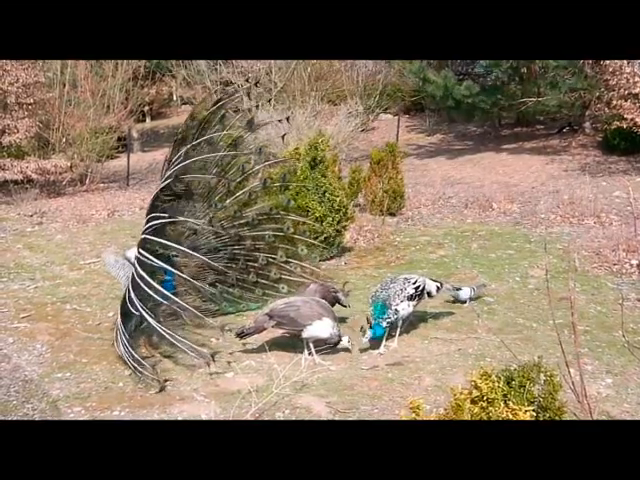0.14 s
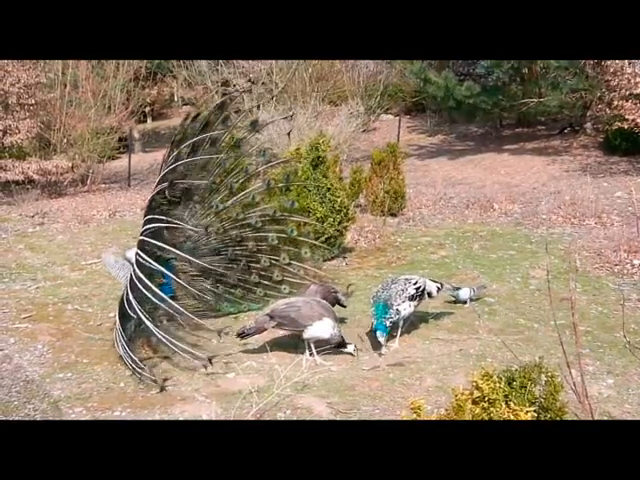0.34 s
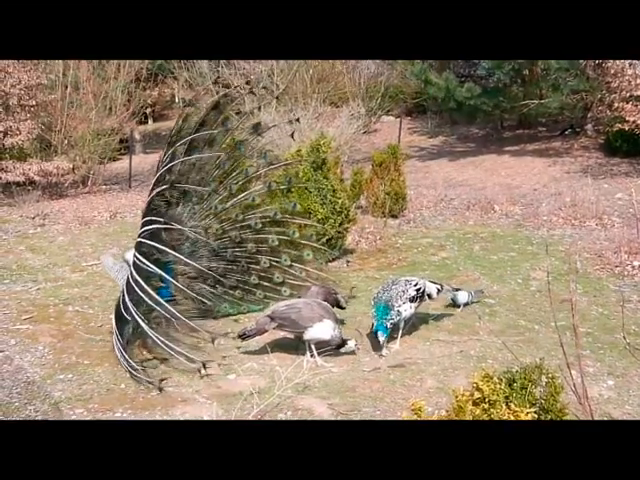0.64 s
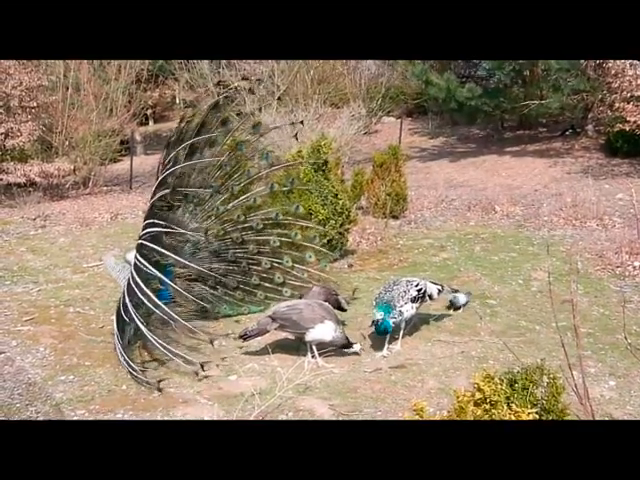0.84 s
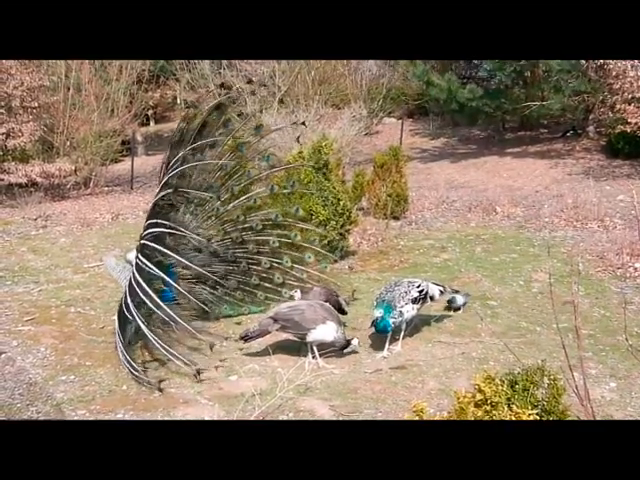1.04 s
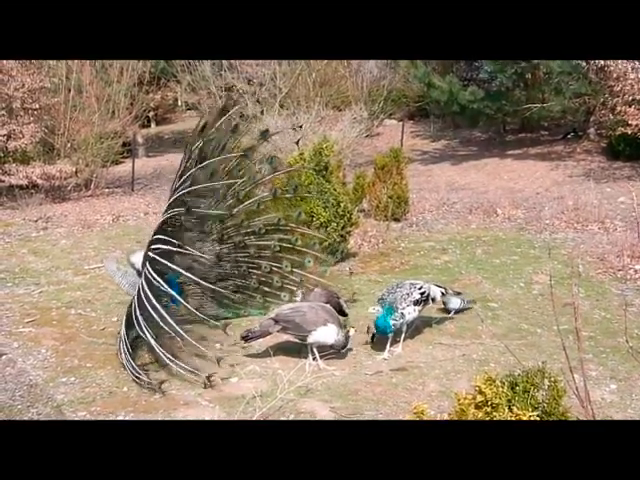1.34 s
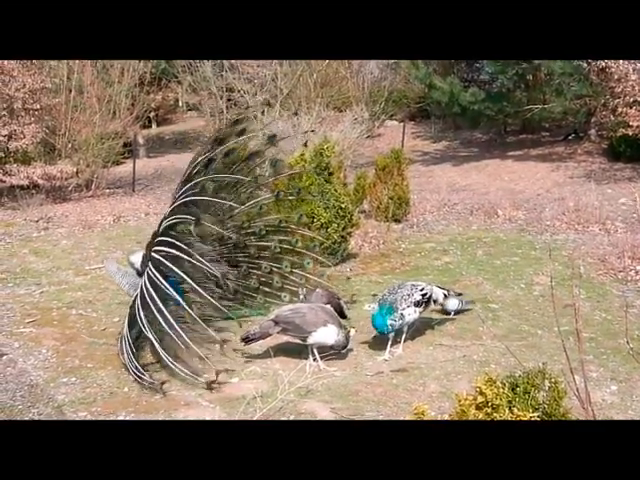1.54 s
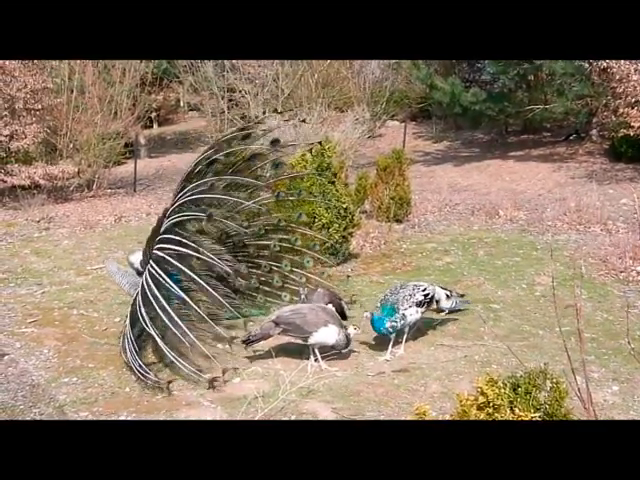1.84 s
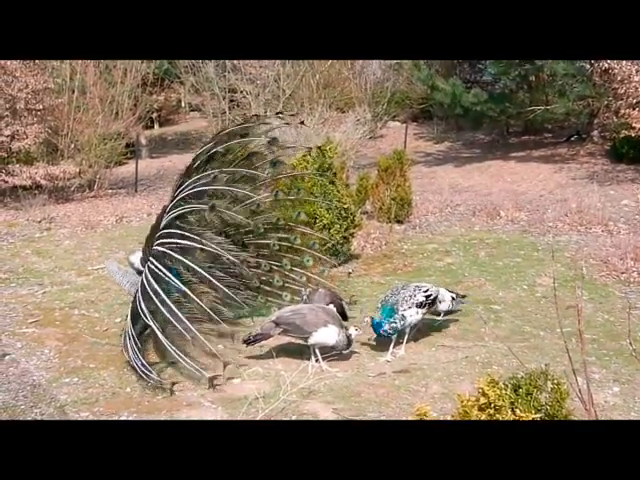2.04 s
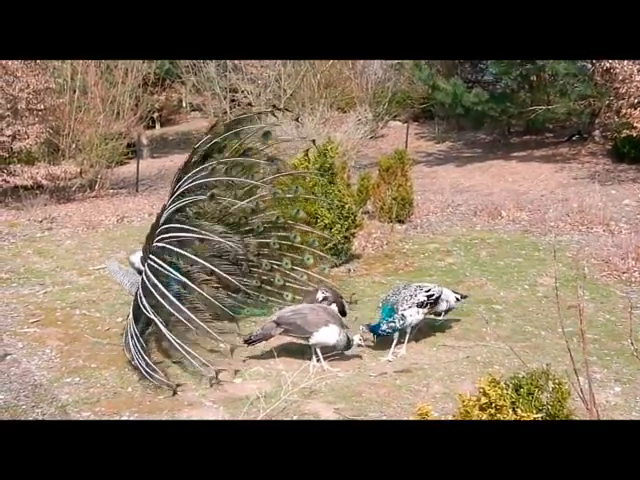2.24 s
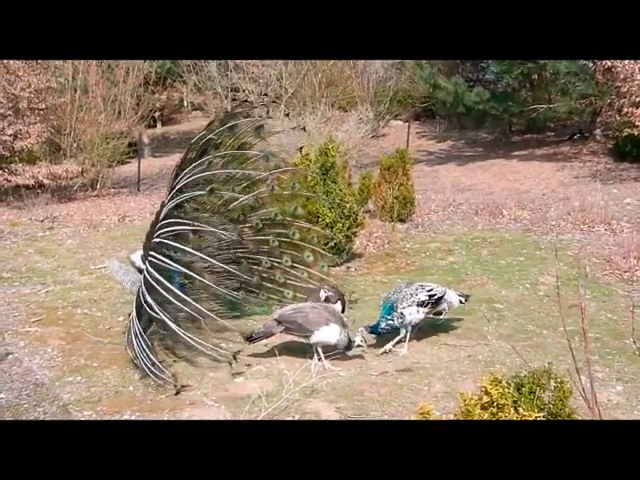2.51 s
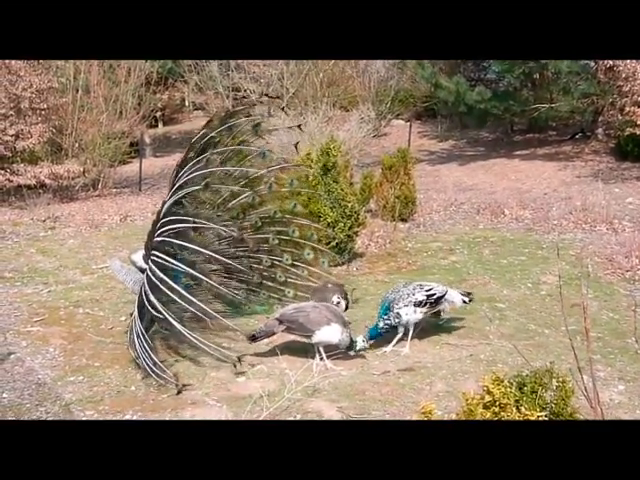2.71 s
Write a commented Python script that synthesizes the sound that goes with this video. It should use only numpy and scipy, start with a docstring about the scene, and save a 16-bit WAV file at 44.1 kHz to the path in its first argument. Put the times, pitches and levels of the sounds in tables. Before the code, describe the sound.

Dry rattling feathers of a displaying peacock, strongest after one second, fade out; small birds chirp and trill to the left, a nearby bird clucks, a closer peep follows, dull taps end it. Open lawn, stereo microphone, faint hiss.

```python
"""A peacock shivers its fanned train from the start: random ticks of barbs and quills swell in bursts, then die off.
Low drone noise, wind rumble on the microphone and open-air hiss lie below; drone and wind come and go.
Songbirds on the left join in: gliding sine tones fall, hold and rise, and two warbled ones trill downward.
Soft thumps and dull taps, both short fading tones, come between; a nearby bird clucks in five tone pulses.
A louder, closer peep follows, and the last taps end the scene."""
import sys
import numpy as np
from scipy import signal
from scipy.io import wavfile
from scipy.ndimage import uniform_filter1d

SR = 44100
rng = np.random.default_rng(int(sys.argv[2]) if len(sys.argv) > 2 else 0)


def unload_wav(signal):
    """Save mono or channel-first audio to the path in sys.argv[1] as 16-bit WAV at rate SR, clipped to [-1, 1]."""
    wavfile.write(
        sys.argv[1],
        SR,
        np.round(np.clip(np.atleast_2d(signal).T, -1, 1) * 32767).astype(np.int16),
    )


def decibels_to_gain(level_db):
    """Convert a level in decibels to a linear amplitude gain (20 dB per decade)."""
    exponent = np.asarray(level_db, float) / 20
    return 10 ** exponent


N = 126567
T = np.arange(N) / SR   # time of each sample, in seconds

# How hard the train shakes. Each row: time in seconds, level in dB before the feathers' own boost.
SHAKE_VIGOUR = [(0.0, -50.5), (0.184, -45.5), (0.2, -47.5), (0.258, -45), (0.296, -51.5), (0.47, -54),
                (0.48, -50.5), (0.766, -47), (0.788, -54), (0.83, -55.5), (0.846, -52), (0.888, -53),
                (0.904, -61), (0.978, -51), (1.1, -43.5), (1.242, -42), (1.402, -43.5), (1.418, -47),
                (1.46, -44), (1.518, -49), (1.528, -45), (1.566, -48), (1.618, -48), (1.746, -53.5),
                (1.762, -60), (1.814, -52.5), (1.9, -61), (1.95, -65), (2.05, -95)]
# Tone colour of the feather ticks. Each row: pitch in Hz, relative strength in dB per Hz.
FEATHER_SPECTRUM = [(240, -26), (400, -15.5), (760, -2), (964, -4.5), (1630, 0), (3280, -4), (4100, -4.5),
                    (4980, -4.5), (11300, -7), (13100, -16), (14100, -21)]
# How alike the feathers sound left and right. Each row: pitch in Hz, likeness from 0 to 1.
FEATHER_LIKENESS = [(60, 0.57), (230, 0.96), (910, 1), (3520, 0.76), (13700, 0.61)]

# Far whistles, named by their glide. Each row: time in seconds, pitch in Hz, level in dB.
FALLING_WHISTLE = [(.968, 5720, -62), (.985, 5210, -54), (1.01, 5000, -56), (1.032, 4300, -52),
                   (1.045, 4500, -55), (1.062, 4450, -50), (1.085, 3630, -52), (1.11, 3000, -55),
                   (1.125, 2850, -63.5)]
HELD_WHISTLE = [(1.545, 4250, -63.5), (1.57, 4230, -56), (1.596, 4260, -55), (1.607, 4260, -69),
                (1.622, 4260, -49), (1.64, 4270, -58), (1.665, 4300, -58), (1.685, 4300, -62)]
RISING_WHISTLE = [(1.93, 3120, -65), (1.946, 3810, -52), (1.95, 4140, -60), (1.962, 3841, -66)]
LONG_RISING_WHISTLE = [(2.008, 2590, -62), (2.017, 2650, -56.5), (2.03, 3270, -55), (2.042, 3770, -46.5),
                       (2.051, 4020, -56), (2.058, 3770, -53), (2.064, 3600, -62)]
SHORT_RISING_WHISTLE = [(2.062, 2900, -68), (2.075, 3250, -59), (2.085, 3380, -66)]
FAINT_WHISTLE = [(2.278, 5600, -70), (2.287, 5000, -65), (2.295, 4050, -67), (2.31, 4050, -64),
                 (2.335, 4200, -66), (2.345, 4200, -75), (2.36, 4150, -63), (2.372, 4100, -72)]
# The near, louder whistle. Each row: time in seconds, pitch in Hz, level in dB.
NEAR_PEEP = [(2.475, 3880, -67), (2.487, 3851, -53), (2.511, 3993, -40), (2.527, 4064, -36),
             (2.567, 3968, -38), (2.581, 3975, -38), (2.591, 3900, -60), (2.597, 4096, -67)]
# Overtones of the peep, from the second harmonic up: level in dB against the main tone.
PEEP_OVERTONES = [-21, -25.5]
# Falling trills. Each row: time in seconds, centre pitch in Hz, level in dB before the throb.
SOFT_TRILL = [(1.69, 4450, -57), (1.703, 4250, -52), (1.72, 3980, -50), (1.75, 3650, -48),
              (1.79, 3470, -47), (1.835, 3380, -46.5), (1.875, 2970, -49), (1.895, 2800, -48)]
LOUD_TRILL = [(2.07, 4400, -60), (2.078, 4270, -56.5), (2.11, 3750, -47), (2.145, 3335, -48),
              (2.16, 3453, -43.5), (2.192, 3410, -42), (2.222, 2937, -44.5), (2.257, 2944, -49.5),
              (2.275, 2770, -48.5), (2.293, 2810, -51), (2.305, 2650, -54)]

# Clucks of the nearby bird. Each row: start in seconds, peak level in dB, pitch in Hz.
CLUCK_PULSES = [(2.197, -45, 644), (2.218, -42.5, 685), (2.241, -35.5, 628), (2.263, -33.5, 632),
                (2.291, -33, 618)]
# Soft low thumps. Each row: start in seconds, peak level in dB, pitch in Hz.
THUMP_PULSES = [(1.643, -40.5, 76), (2.274, -34, 70.0), (2.419, -37, 101)]
# Dull taps on the ground. Each row: start in seconds, peak level in dB, pitch in Hz.
TAP_PULSES = [(1.646, -41.5, 610), (2.746, -39.5, 567), (2.803, -41, 608), (2.815, -39, 500)]

# Strength of the low drone. Each row: time in seconds, level in dB.
DRONE_LEVEL = [(0.0, -46), (0.03, -46), (0.62, -70.5), (1.62, -50), (1.65, -50), (1.74, -50.5), (1.79, -45),
               (1.86, -47), (2.26, -51), (2.36, -39.5), (2.38, -59.5), (2.43, -41), (2.68, -44),
               (2.69, -38), (2.85, -44.5), (2.87, -42)]
# Strength of the wind on the microphone ports. Each row: time in seconds, level in dB.
WIND_GUSTS = [(0.0, -44.5), (0.07, -42.5), (0.45, -54.5), (0.49, -56), (0.52, -52.5), (1.62, -76),
              (1.65, -39.5), (1.7, -54), (2.02, -56.5), (2.3, -46), (2.39, -51.5), (2.42, -45),
              (2.49, -54.5), (2.73, -60), (2.75, -50), (2.87, -60)]
# Tone colour of the open air. Each row: pitch in Hz, relative strength in dB per Hz.
AIR_SPECTRUM = [(40, -2.5), (83, -3.5), (223, -7), (408, -14.5), (620, -13), (1200, -18), (2200, -22),
                (3500, -24), (5500, -28), (9000, -33), (13000, -36.5)]
# How alike the air sounds left and right. Each row: pitch in Hz, likeness from 0 to 1.
AIR_LIKENESS = [(60, 0.76), (250, 1), (900, 0.88), (3500, 0.17), (12000, 0.14)]
# Which side the air leans to. Each row: pitch in Hz, left minus right in dB.
AIR_BALANCE = [(60, 1.5), (250, -1.3), (900, 5.5), (3500, 8.5), (12000, 0.5)]


def rms_one(x):
    """Scales a sound to an average strength (rms) of 1."""
    return x / np.sqrt(np.mean(x ** 2) + 1e-20)


def in_time(rows):
    """Draws straight lines between the rows: one curve over time for each column."""
    s, *columns = np.transpose(rows)
    return [np.interp(T, s, c) for c in columns]


def at_hz(points, hz):
    """Reads a table at one pitch, on a scale of octaves."""
    table_hz, values = np.transpose(points)
    return np.interp(np.log(hz), np.log(table_hz), values)


def drift(rate_hz):
    """Slow random wandering with a spread of 1: smoothed noise, one value every 40 samples."""
    r = np.exp(-2 * np.pi * rate_hz * 40 / SR)
    noise = rng.standard_normal(N // 40 + 2002)
    slow = signal.lfilter([1], [1, -2 * r, r * r], noise)[2000:]   # drop the filter's start
    return np.interp(np.arange(N) / 40, np.arange(len(slow)), rms_one(slow))


def band(x, low_hz, high_hz):
    """Keeps only what lies between two pitches."""
    return signal.sosfilt(signal.butter(2, [low_hz, high_hz], "band", fs=SR, output="sos"), x)


def cut_above(x, hz):
    """Steeply removes all above a pitch."""
    return signal.sosfilt(signal.ellip(10, .5, 70, hz, fs=SR, output="sos"), x)


def pan(x, db):
    """Makes the left ear louder than the right by db."""
    return x * decibels_to_gain(np.array([[db / 2], [-db / 2]]))


def spread(mid, side, alike):
    """Mixes a shared and an opposed noise into two ears of a given likeness."""
    alike = np.clip(alike, 0, 1)
    shared = np.sqrt(1 + alike) * mid
    opposed = np.sqrt(1 - alike) * side * [[1], [-1]]
    return (shared + opposed) / np.sqrt(2)


def coloured(white, spectrum, alike, balance, patchy_db, from_hz, tilt_db=0.):
    """Half-octave bands with own level, flicker, likeness and balance; spread 1 from from_hz to 11900 Hz."""
    out = 0
    edges = np.minimum(40 * 2 ** np.arange(0, 9.1, .5), 18000)
    for k, (low, high) in enumerate(zip(edges, edges[1:])):
        hz = np.sqrt(low * high)
        mid, side = band(white[k % 2], low, high)   # neighbouring bands use different noise
        level_db = at_hz(spectrum, min(hz, 13000)) + patchy_db * drift(14)
        gain = decibels_to_gain(level_db + tilt_db * np.log2(hz / 7000))
        out = out + gain * pan(spread(mid, side, at_hz(alike, hz)), at_hz(balance, hz))
    return out / np.std(band(out, from_hz, 11900))


def pulses(rows, rise_s, fall_s, octave_db):
    """Short tones, each with its octave above, that swell and die away."""
    out = np.zeros(N)
    for s, db, hz in rows:
        t = np.maximum(T - s, 0)
        shape = (1 - np.exp(-t / rise_s)) ** 2 * np.exp(-t / fall_s)
        tone = np.sin(2 * np.pi * hz * t) + decibels_to_gain(octave_db) * np.sin(4 * np.pi * hz * t)
        out += decibels_to_gain(db) * shape / shape.max() * tone
    return out


def scatter(x, start_s, t60_s):
    """A cloud of fading echoes, a different one in each ear, of the same energy as the sound."""
    after = T[:SR // 2] - start_s
    cloud = rng.standard_normal((2, SR // 2)) * decibels_to_gain(-60 * after / t60_s) * (after > 0)
    cloud = cloud / np.sqrt(np.sum(cloud ** 2, axis=1, keepdims=True))
    return signal.fftconvolve(x, cloud, axes=1)[:, :N]


def feathers():
    """The train swings to and fro; ticks of uneven size are biggest at the turns of each swing."""
    shiver_hz, wander = 25.55, 0.032   # wander is a share of the shiver rate
    swing_depth, half_swing_depth = 0.069, 0.12
    ticks_per_s, tick_spread_db = 9000, 2.5   # ticks in each of four noise streams
    boost_db, pan_db = 2, 1.2
    brighter_db_per_octave = 0.0077   # for each dB of vigour
    turn = 2 * np.pi * np.cumsum(shiver_hz * (1 + wander * drift(1.93))) / SR
    bunching = 1 + swing_depth * np.cos(turn) + half_swing_depth * np.cos(2 * turn)
    shape = (2, 2, N)
    sizes = decibels_to_gain(tick_spread_db * np.minimum(rng.exponential(1, shape), 5))
    signs = rng.choice([-1, 1], shape)
    happens = rng.random(shape) < ticks_per_s / SR
    ticks = sizes * signs * happens * bunching
    vigour_db, = in_time(SHAKE_VIGOUR)
    below_peak_db = np.maximum(vigour_db, -65) - vigour_db.max()
    balance = [(100, pan_db), (10000, pan_db)]
    rustle = coloured(ticks, FEATHER_SPECTRUM, FEATHER_LIKENESS, balance, patchy_db=1.0, from_hz=4660,
                      tilt_db=brighter_db_per_octave * below_peak_db)
    return decibels_to_gain(vigour_db + boost_db) * rustle


def whistle(rows, flutter_db, swing_hz=0., top_s=0., throb=0., overtones_db=()):
    """A near sine along a pitch and level curve; a trill also swings in pitch and throbs in level."""
    trill_hz = 61.6   # warbles a second
    hz, db = in_time(rows)
    warble = np.cos(2 * np.pi * trill_hz * (T - top_s))   # highest at top_s
    phase = 2 * np.pi * np.cumsum(uniform_filter1d(hz, size=300) + swing_hz * warble) / SR
    edges = np.clip(np.minimum(T - rows[0][0], rows[-1][0] - T) / 0.002, 0, 1)   # 2 ms fades
    overtones = sum(decibels_to_gain(o) * np.sin((k + 2) * phase) for k, o in enumerate(overtones_db))
    tone = np.sin(phase) + overtones
    level = np.sqrt(2) * decibels_to_gain(db + flutter_db * drift(46))
    return level * edges * (1 - throb * (1 - warble) / 2) * tone


def songbirds():
    """Whistles and trills from the left; the air makes them flutter, ground, bushes and trees echo them."""
    far_flutter_db, near_flutter_db = 2.5, 1.8
    throb = .7   # share of a trill's level lost at its low turn
    far_pan_db, near_pan_db, left_lag_s = 12.5, 12, 5e-5
    whistles = (FALLING_WHISTLE, HELD_WHISTLE, RISING_WHISTLE, LONG_RISING_WHISTLE,
                SHORT_RISING_WHISTLE, FAINT_WHISTLE)
    far = sum(whistle(rows, far_flutter_db, overtones_db=[-20]) for rows in whistles)
    far = far + whistle(SOFT_TRILL, far_flutter_db, swing_hz=145, top_s=1.70, throb=throb)
    far = far + whistle(LOUD_TRILL, far_flutter_db, swing_hz=200, top_s=1.9, throb=throb)
    near = whistle(NEAR_PEEP, near_flutter_db, overtones_db=PEEP_OVERTONES)
    # ground and bushes blur the far song
    panned = pan(far, far_pan_db)
    blur = decibels_to_gain(-10) * scatter(panned, start_s=0.0043, t60_s=.18)
    left, right = panned + blur + pan(near, near_pan_db)
    direct = np.array([np.interp(T - left_lag_s, T, left), right])
    # trees throw the song back, a little more to the right
    echo = scatter(band(far + near, 2000, 5500)[None], start_s=.075, t60_s=.5)
    return direct + decibels_to_gain(-14) * pan(echo, -3.5)


def clucks():
    """A bird nearby: quick tone pulses in the middle."""
    return pulses(CLUCK_PULSES, rise_s=0.0013, fall_s=0.0068, octave_db=-13)


def thumps():
    """Soft low tones that die within a few hundredths of a second."""
    return pulses(THUMP_PULSES, rise_s=0.0032, fall_s=.015, octave_db=-30)


def taps():
    """Dull taps on the ground: very short tones with a clear octave."""
    return pulses(TAP_PULSES, rise_s=.001, fall_s=0.0036, octave_db=-9.5)


def drone():
    """Far, lumpy noise in one low resonance, in the middle."""
    centre_hz, width_hz, lumpy_db = 202.6, 74, 0.5
    hum = band(rng.standard_normal(N), centre_hz - width_hz / 2, centre_hz + width_hz / 2)
    level_db, = in_time(DRONE_LEVEL)
    return decibels_to_gain(level_db) * rms_one(hum * decibels_to_gain(lumpy_db * drift(7.6)))


def wind():
    """Lumpy low rumble of wind on the microphone, partly its own in each port, stronger on the right."""
    low_hz, high_hz, lumpy_db = 39.4, 140, 3
    likeness, pan_db = 0.28, -9
    rumble = band(rng.standard_normal((2, N)), low_hz, high_hz)
    mid, side = rumble * decibels_to_gain(lumpy_db * drift(20))
    level_db, = in_time(WIND_GUSTS)
    return decibels_to_gain(level_db) * pan(rms_one(spread(mid, side, likeness)), pan_db)


def air():
    """Open-air hiss and far rumble: coloured noise at an even level with a slight flicker, cut at the top."""
    level_db, top_hz = -50.5, 12900
    white = rng.standard_normal((2, 2, N))
    hiss = coloured(white, AIR_SPECTRUM, AIR_LIKENESS, AIR_BALANCE, patchy_db=1.08, from_hz=396)
    return cut_above(decibels_to_gain(level_db) * hiss, top_hz)


def scene():
    """Adds all the sources together."""
    main = feathers() + songbirds()
    knocks = clucks() + thumps() + taps()
    background = drone() + wind() + air()
    return main + knocks + background


def low_pass(x):
    """Removes everything above the highest recorded frequency."""
    return signal.sosfilt(signal.butter(12, 14290, fs=SR, output="sos"), x)


def record(dry):
    """Cuts the top of the whole scene."""
    mix = cut_above(dry, 13750)   # Hz
    return low_pass(mix)


dry = scene()
out = record(dry)
unload_wav(out)
```